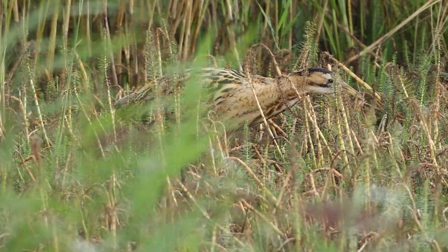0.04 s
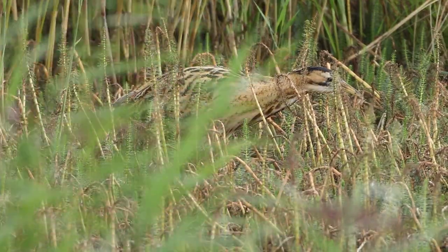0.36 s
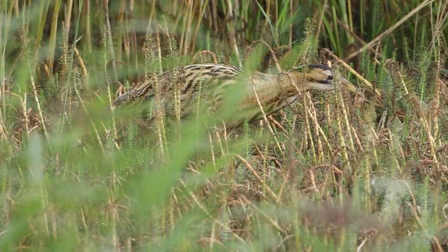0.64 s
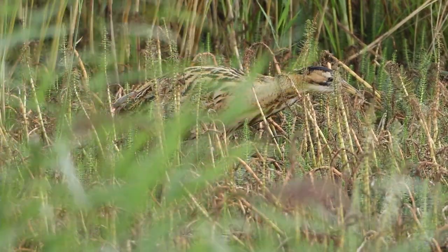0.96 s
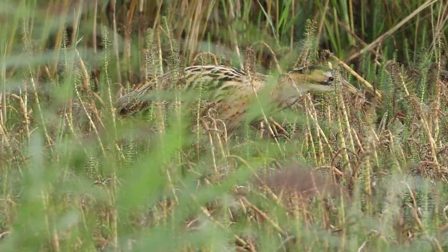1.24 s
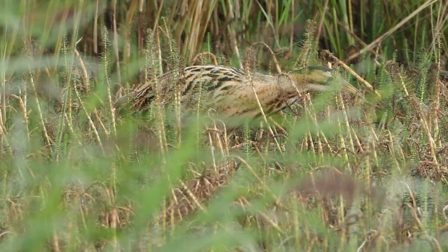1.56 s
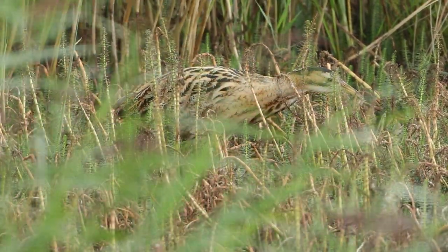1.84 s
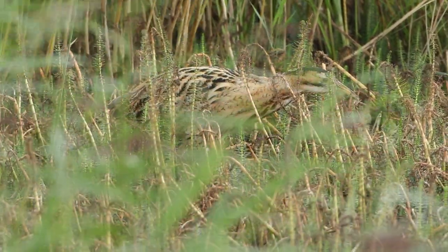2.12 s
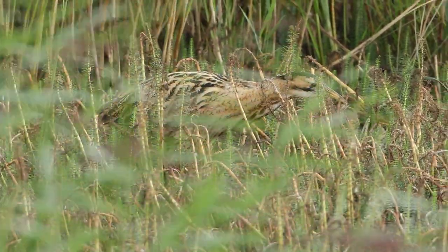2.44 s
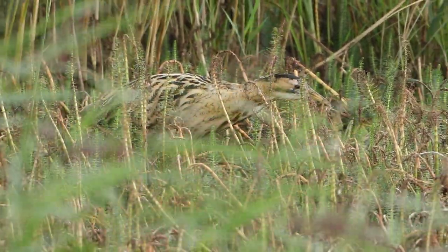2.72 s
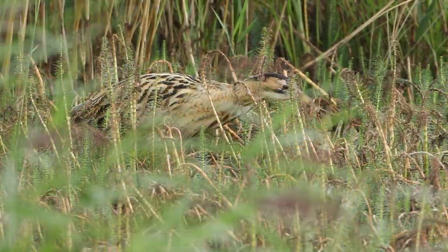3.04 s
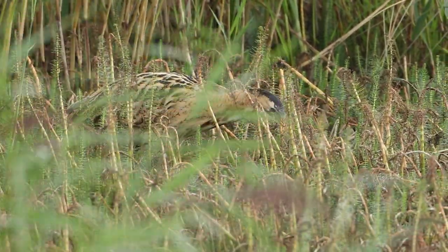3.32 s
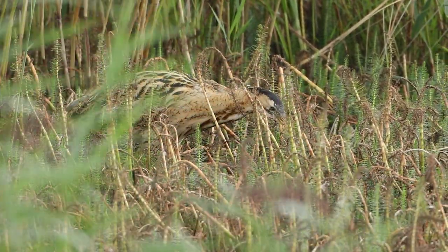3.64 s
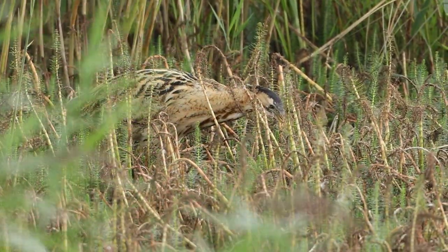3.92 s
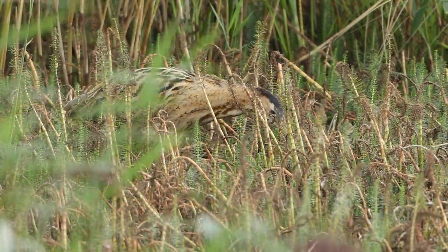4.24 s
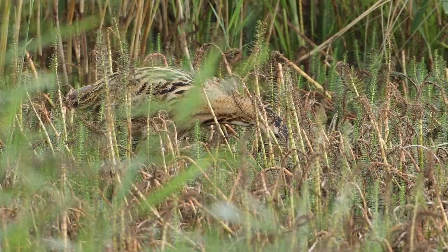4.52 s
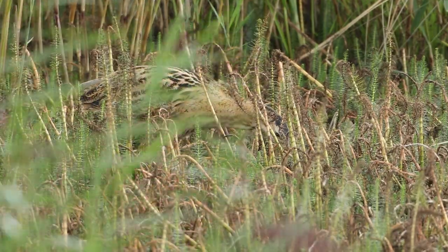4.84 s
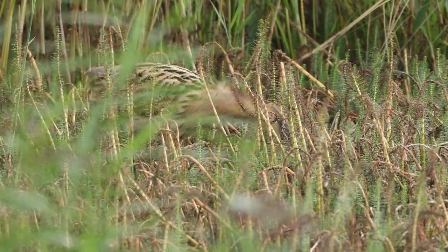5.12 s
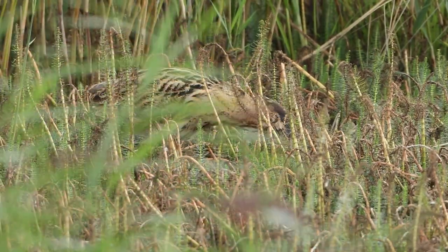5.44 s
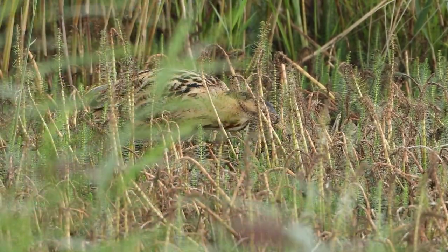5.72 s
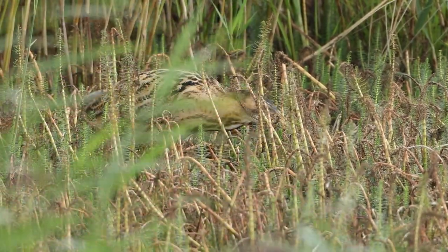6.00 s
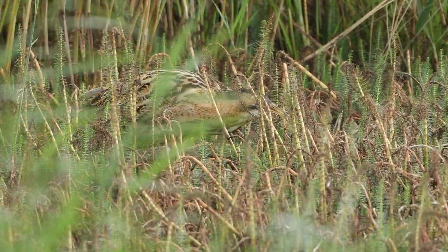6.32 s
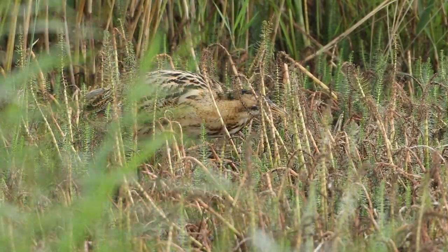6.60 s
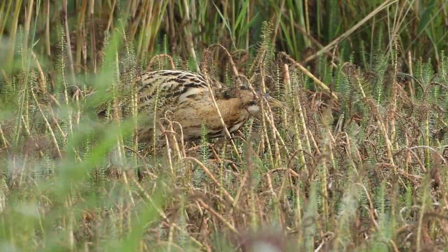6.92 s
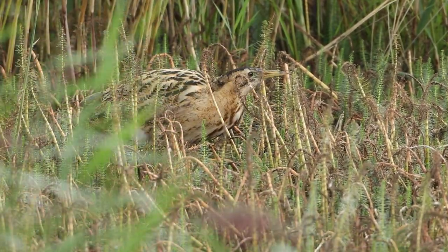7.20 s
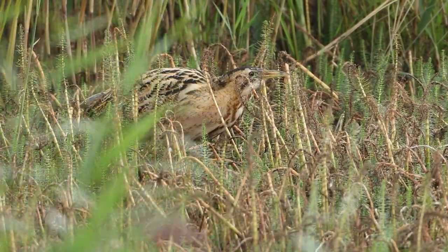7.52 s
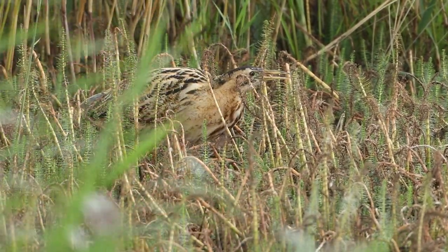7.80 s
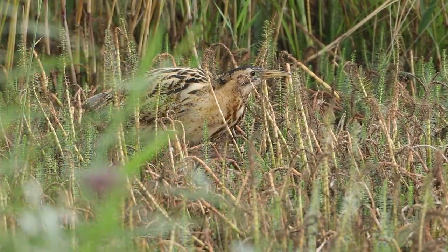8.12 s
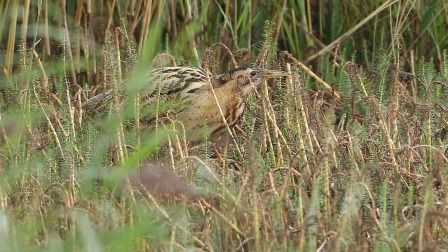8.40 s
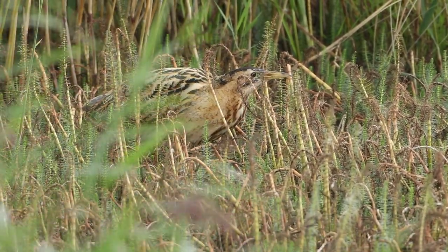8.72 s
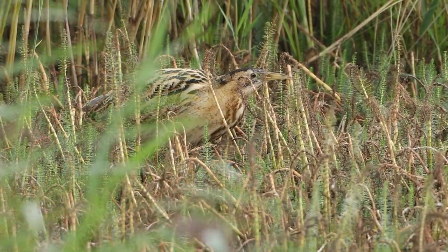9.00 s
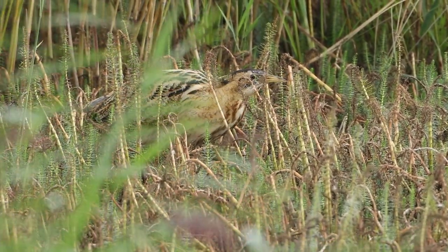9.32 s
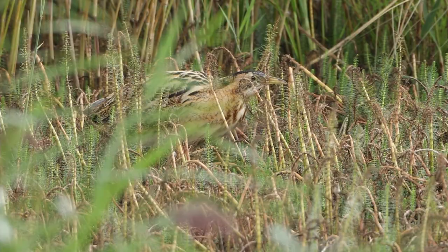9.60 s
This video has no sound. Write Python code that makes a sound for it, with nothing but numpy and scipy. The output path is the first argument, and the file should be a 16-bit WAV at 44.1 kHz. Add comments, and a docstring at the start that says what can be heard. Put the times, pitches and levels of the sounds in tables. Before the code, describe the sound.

Wind rumbles and thumps unevenly on the microphone in an open wetland, with a light hiss of leaves close by. A distant wood pigeon finishes a cooing phrase, then repeats it as a broad rush swells in the reeds. Later a small bird gives one faint, thin call. The gusts grow stronger, the hardest coming at the very end. Everything is heard on the left side only.

```python
"""Wind over a reed bed in an open wetland, picked up by one microphone on the left channel only.
From the start, turbulence buffets the microphone, smooth flow hums as it sheds vortices, close leaves
hiss and brush, and a far wood pigeon is partway through a phrase. From about 2 s it coos the phrase
again, while a broad rush swells in the far reeds and the stems sough. Near 7 s a small bird calls
faintly, once. The gusts then grow, and the hardest breaks into a roar at the very end."""
import sys
import numpy as np
from scipy import signal
from scipy.fft import rfft, irfft, next_fast_len
from scipy.io import wavfile
from scipy.ndimage import uniform_filter1d

SR = 44100
rng = np.random.default_rng(int(sys.argv[2]) if len(sys.argv) > 2 else 0)


def put_to_file(sound):
    """Save the sound as 16-bit audio at rate SR, in the file named by the first command-line argument."""
    columns = np.atleast_2d(sound).T  # one column per channel
    safe = np.clip(columns, -1, 1)
    whole_steps = np.round(safe * 32767)
    wavfile.write(sys.argv[1], SR, whole_steps.astype(np.int16))


N = 429975
TIME = np.arange(N) / SR

# spells of smooth flow: start_s, length_s, pitch_hz, level_db (all table levels are relative)
SMOOTH_SPELLS = [(0, .24, 49, -40.5), (.25, .53, 53.5, -38), (.95, .25, 55.6, -41), (1.88, .15, 45, -32.5),
                 (3.99, .11, 59, -35), (5.05, .34, 56, -35)]
CALM_EDGE_S = 0.057   # rise and fall time of smooth spells and lulls


def from_db(db):
    """Amplitude grows tenfold for every 20 decibels."""
    return 10 ** (np.asarray(db) / 20)


def rms_one(x):
    """Normalisation to unit mean power."""
    return x / np.sqrt(np.mean(x ** 2) + 1e-20)


def in_time(rows):
    """Linear interpolation of each column over the times in the first."""
    times, *columns = np.transpose(rows)
    return [np.interp(TIME, times, column) for column in columns]


def swell(start, length, edge_s):
    """An amplitude envelope that opens smoothly, holds and closes."""
    opening = np.clip(np.minimum(TIME - start, start + length - TIME) / edge_s + .5, 0, 1)
    return opening * opening * (3 - 2 * opening)


def drift(rate_hz):
    """Low-passed noise gives a slow random fluctuation; rms 1."""
    step, settle = 40, 2000
    pole = np.exp(-2 * np.pi * rate_hz * step / SR)
    noise = rng.standard_normal(N // step + settle + 2)
    slow = signal.lfilter([1], [1, -2 * pole, pole * pole], noise)[settle:]
    return np.interp(np.arange(N) / step, np.arange(len(slow)), rms_one(slow))


def coloured(x, spectrum):
    """Spectral shaping, with a fall of 24 dB an octave past the spectrum's ends; rms 1."""
    hz, db = np.transpose(spectrum)
    size = next_fast_len(N)
    octave, points = np.log2(np.fft.rfftfreq(size, 1 / SR) + 1), np.log2(hz)
    beyond = np.abs(octave - np.clip(octave, points[0], points[-1]))
    gain = from_db(np.interp(octave, points, db) - 24 * beyond)
    return rms_one(irfft(rfft(x, size) * gain, size)[:N])


def tone(hz):
    """A sine whose phase is the integral of its frequency; rms 1."""
    return np.sqrt(2) * np.sin(2 * np.pi * np.cumsum(hz) / SR)


def noise_band(centre_hz, width_hz):
    """Quadrature modulation carries low-passed noise to a moving centre frequency; rms 1."""
    narrow = signal.butter(2, width_hz / 2, fs=SR, output="sos")
    in_phase, quadrature = signal.sosfilt(narrow, rng.standard_normal((2, N)))
    phase = 2 * np.pi * np.cumsum(centre_hz) / SR
    return rms_one(in_phase * np.cos(phase) + quadrature * np.sin(phase))


def turbulence(spectrum, span_s):
    """Random pressure swings, divided by their smoothed envelope to hold their strength even."""
    swings = coloured(rng.standard_normal(N), spectrum)
    power = np.abs(signal.hilbert(swings, next_fast_len(N))[:N]) ** 2
    width = max(int(span_s * SR), 2)
    local_power = uniform_filter1d(uniform_filter1d(power, width), width)
    return rms_one(swings / np.sqrt(local_power + 1e-9))


def open_air(level_db=-57.5):
    """Stationary noise forms the dull background of the open land."""
    # ambient spectrum: frequency_hz, density_db
    spectrum = [(120, -17), (230, -0.5), (320, 3), (450, 4.5), (700, -5.5), (1200, -23), (2500, -12)]
    return from_db(level_db) * coloured(rng.standard_normal(N), spectrum)


def buffeting(roar_db=-40.0, roar_onset_db=-29, roar_growth=2.9, lump_rate_hz=14.5):
    """Turbulent pressure on the microphone: large eddies rumble, small ones flutter, hard gusts roar."""
    # the breeze between gusts: time_s, rumble_db, flutter_db
    breeze = [(0, -36.5, -54), (0.55, -44, -51.5), (0.83, -44, -52), (1.05, -28, -49), (1.3, -43, -58),
              (1.55, -37, -56), (1.9, -37, -47.5), (2.3, -43.5, -54), (2.7, -37, -51), (3.1, -36, -52),
              (3.6, -41, -49), (4.1, -41.5, -46.5), (4.85, -39.5, -47), (5.55, -37.5, -47.5),
              (6.35, -38.5, -42.5), (7.5, -37.5, -41), (8.2, -30, -45.5), (8.75, -36, -40),
              (9.05, -30, -39), (9.45, -34, -41), (9.6, -24.5, -32.5)]
    # lulls in the air at the microphone: start_s, length_s
    lulls = [(1.49, 0.13), (2.47, 0.36), (3.395, .05), (4.11, .09), (4.655, 0.27), (5.73, 0.043),
             (6.25, 0.28), (7.2, 0.083), (7.356, 0.18)]
    # gusts that thump the microphone: start_s, length_s, rumble_db, flutter_db
    gusts = [(0.58, 0.051, -28, -43), (0.913, 0.057, -29, -54), (1.318, 0.13, -35, -44),
             (1.65, 0.05, -45, -45), (1.705, 0.04, -34, -54), (1.848, 0.03, -36, -54),
             (2.065, 0.041, -38, -54), (2.259, 0.069, -31.5, -42.5), (2.375, 0.065, -41, -54),
             (2.895, 0.064, -37.5, -36.5), (3.047, 0.076, -34, -45.5), (3.14, 0.22, -40, -40),
             (3.54, 0.16, -39, -45.5), (3.828, 0.077, -32.5, -45), (4.218, 0.056, -34.5, -44),
             (4.48, 0.12, -36.5, -44), (5.689, 0.033, -27, -39), (5.808, 0.057, -33.5, -61),
             (6.012, 0.037, -30.5, -41), (6.122, 0.071, -32, -43), (6.543, 0.045, -31.5, -51),
             (6.91, 0.11, -42, -40), (7.022, 0.068, -35, -40), (7.303, 0.035, -36, -35),
             (7.631, 0.11, -31.5, -53), (7.844, 0.15, -30.5, -45.5), (8.07, 0.11, -31, -48),
             (8.282, 0.21, -19.5, -34), (8.835, 0.032, -23, -38), (8.907, 0.063, -35, -33),
             (9.184, 0.073, -34, -33.5), (9.29, 0.075, -28, -33), (9.62, 0.095, -33, -35),
             (9.714, 0.039, -17, -27.5)]
    # spectra of the large, small and finest eddies: frequency_hz, density_db
    rumble_spectrum = [(15, -18), (25, -7.5), (36, 2.5), (55, 4.5), (75, -1), (100, -13), (130, -28.5),
                       (200, -46)]
    flutter_spectrum = [(60, -6), (100, 7), (130, 0), (170, -5.5), (220, -14), (300, -28), (500, -55),
                        (1000, -59)]
    roar_spectrum = [(130, -11), (250, 9), (350, -3), (500, -19), (1000, -23), (2000, -46)]
    rumble_db, flutter_db = in_time(breeze)
    smooth_flow = sum(swell(start, length, CALM_EDGE_S) for start, length, _, _ in SMOOTH_SPELLS)
    lull = sum(swell(start, length, CALM_EDGE_S) for start, length in lulls)
    calm_db = -7 * smooth_flow - 5 * lull
    large_power = from_db(rumble_db + calm_db + 1.7 * drift(lump_rate_hz)) ** 2
    small_power = from_db(flutter_db + 2 * drift(lump_rate_hz)) ** 2
    for start, length, large_db, small_db in gusts:   # incoherent sources add in power
        gust = swell(start, length, edge_s=0.013)
        large_power += gust * from_db(large_db) ** 2
        small_power += gust * from_db(small_db) ** 2
    rumble = from_db(1.3) * np.sqrt(large_power) * turbulence(rumble_spectrum, span_s=0.047)
    flutter = from_db(1.04) * np.sqrt(small_power) * turbulence(flutter_spectrum, span_s=0.059)
    # the finest eddies grow faster than the gust itself
    strength = np.sqrt(small_power) / from_db(roar_onset_db)
    roar = from_db(roar_db) * strength ** roar_growth * turbulence(roar_spectrum, span_s=0.0097)
    return rumble + flutter + roar


def vortex_hum(flicker_db=2, waver=0.013):
    """Vortex shedding: smooth flow drops eddies at a nearly steady rate, heard as a low tone."""
    hz, = in_time([(start + length / 2, pitch) for start, length, pitch, _ in SMOOTH_SPELLS])
    level = sum(from_db(db) * swell(start, length, CALM_EDGE_S) for start, length, _, db in SMOOTH_SPELLS)
    return level * from_db(flicker_db * drift(4.0)) * tone(hz * (1 + waver * drift(6.4)))


def far_rush(rush_db, trim_db=1.55, patchy_db=-0.07):
    """Incoherent summation: countless far stems merge into a smooth rush."""
    # spectrum of the far reeds: frequency_hz, density_db
    spectrum = [(120, 0), (220, -3), (330, -5), (480, -3.5), (650, -3.5), (820, -3), (1050, -4),
                (1300, -6.5), (1600, -9), (2100, -18.5), (3000, -25), (4200, -33.5), (8000, -46)]
    level = from_db(rush_db + trim_db + patchy_db * drift(10.0))
    return level * coloured(rng.standard_normal(N), spectrum)


def leaf_hiss(hiss_db, trim_db=7.5, ticks_per_s=1100, grain_db=-6, size_spread_db=1.5, clump_db=1.5):
    """Shot noise: dry leaves tick more often as the wind rises, over a hiss of blended contacts."""
    # spectrum of the close leaves: frequency_hz, density_db
    spectrum = [(200, 3), (500, 15.5), (1200, 6.5), (2100, 3.5), (3050, 3.5), (3500, 1.5), (4100, 0),
                (4800, 0.54), (7500, -2.5), (10800, -7), (12300, -12), (13800, -20), (15500, -24)]
    tick_rate = ticks_per_s * from_db(hiss_db - hiss_db.max() + clump_db * drift(9))
    sizes = from_db(size_spread_db * np.minimum(rng.exponential(1, N), 4)) * rng.choice([-1, 1], N)
    ticks = rms_one(sizes * (rng.random(N) < tick_rate / SR))
    sway_db = .3 * drift(3)   # the hiss rises and falls as the stems sway
    contacts = rng.standard_normal(N) + from_db(grain_db) * ticks
    return from_db(hiss_db + trim_db + sway_db) * coloured(contacts, spectrum)


def pigeon(waver=0.0074, flicker_db=-1.0, slide_hz_per_s=600, echo_s=.16, echo_db=-20):
    """A coo is a tone plus narrow-band noise, hoarse where it slides or sinks; a faint echo follows."""
    # five notes of a wood pigeon's phrase, a curve each: time_in_phrase_s, pitch_hz, level_db
    notes = [
        [(.03, 418, -53), (.08, 442, -52), (.125, 512, -49), (.16, 486, -48.5), (.235, 478, -48),
         (.265, 492, -46.5)],
        [(.525, 488, -50.5), (.58, 493, -49.5), (.62, 488, -53), (.68, 490, -48), (.735, 495, -45.5),
         (.765, 510, -49.5), (.81, 494, -46.5), (.92, 500, -45), (.975, 492, -44.5), (1.0, 478, -47)],
        [(1.07, 250, -60), (1.14, 305, -59), (1.165, 420, -55), (1.18, 488, -46), (1.21, 525, -48),
         (1.235, 492, -44.5), (1.27, 476, -51), (1.31, 430, -55), (1.4, 398, -57), (1.53, 370, -60)],
        [(1.865, 450, -56), (1.895, 470, -51.5), (1.99, 425, -55)],
        [(2.17, 398, -61), (2.29, 420, -54), (2.37, 413, -58), (2.46, 410, -55), (2.62, 385, -59),
         (2.69, 330, -58)],
    ]
    # the two phrases: start_s, then gain_db for each of the five notes
    phrases = [(-.82, 0, -1.5, 1, -.5, .5), (2.22, 0, .5, -1, -1.5, -4)]
    clear_db, hoarse_db = -17, -4   # noise relative to the tone
    hoarse_hz, clear_hz = 400, 480
    voice = np.zeros(N)
    wobble = 1 + waver * drift(38.5)
    flicker = from_db(flicker_db * drift(30))
    for start, *gains_db in phrases:
        for note, gain_db in zip(notes, gains_db):
            curve = np.array(note) + [start, 0, gain_db]
            hz, db = in_time(curve)
            glide_hz_per_s = uniform_filter1d(np.abs(np.gradient(hz)) * SR, size=3000)
            sliding = np.clip(glide_hz_per_s / slide_hz_per_s, 0, 1)
            low = np.interp(hz, [hoarse_hz, clear_hz], [1, 0])
            hoarse = from_db(clear_db + np.maximum(sliding, low) * (hoarse_db - clear_db))
            level = from_db(db) * swell(curve[0, 0], curve[-1, 0] - curve[0, 0], edge_s=0.028)
            coo = tone(hz * wobble) + hoarse * noise_band(hz, width_hz=80)
            voice += level * coo / np.hypot(1, hoarse)
    voice *= flicker
    return voice + from_db(echo_db) * np.interp(TIME - echo_s, TIME, voice, left=0)


def leaf_brushes():
    """Sliding friction: one leaf passing over another gives a short swish of band-limited noise."""
    # contacts close by: time_s, level_db, half_length_s, band_hz
    contacts = [(.356, -63, .001, 8000), (.36, -73, .04, 9500), (2.083, -63, .001, 7000),
                (2.647, -60, .001, 7000), (3.773, -70, .02, 9500), (4.09, -68, .05, 6500),
                (4.547, -59, .001, 8000), (5.738, -59.5, .001, 8000), (8.129, -57, .001, 7000),
                (8.139, -68.5, 0.013, 9000), (8.143, -63, 0.01, 5480), (8.885, -62, 0.012, 3600)]
    out = np.zeros(N)
    for time_s, db, half_length, hz in contacts:
        band = signal.butter(2, [hz * 0.63, min(hz * 1.2, SR / 3)], "band", fs=SR, output="sos")
        envelope = np.exp(-((TIME - time_s) / half_length) ** 2 / 2)
        out += from_db(db) * envelope * rms_one(signal.sosfilt(band, rng.standard_normal(N)))
    return out


def eddy_hits():
    """A vortex has a low-pressure core, so it passes as a dip between two shallow rises."""
    # single eddies that hit the microphone: time_s, peak_db, half_width_s
    eddies = [(0.615, -21, 0.0038), (.82, -31.5, 0.0025), (1.049, -29, 0.0032), (1.173, -24, .0027),
              (1.268, -25, 0.0042), (1.386, -21.5, .003), (1.42, -23, 0.0023), (1.457, -26, 0.0034),
              (1.84, -31.5, .002), (2.003, -25.5, 0.0028), (2.152, -22, .004), (2.222, -22, 0.0045),
              (2.272, -27, 0.0046), (2.313, -32, 0.0033), (2.41, -28, 0.0029), (2.956, -16.5, 0.0023),
              (3.145, -22.5, 0.0026), (3.172, -24, 0.0029), (3.25, -24, 0.0026), (3.31, -24, 0.0027),
              (3.352, -23, 0.0044), (3.385, -27.5, 0.0026), (3.467, -23.5, 0.0028), (3.503, -25.5, .0023),
              (3.63, -31, .0023), (3.676, -23, 0.0028), (3.724, -27, 0.0031), (3.899, -18.5, 0.0035),
              (3.94, -27.5, 0.0024), (4.18, -30.5, 0.0033), (4.24, -26, 0.0031), (4.524, -27, 0.0022),
              (4.605, -27, 0.0046), (5.361, -27, .0038), (5.529, -24.5, .003), (5.612, -31.5, 0.0019),
              (5.707, -28, 0.0035), (6.017, -24, 0.0023), (6.464, -29, .0018), (6.542, -25, 0.0026),
              (6.69, -32.5, .002), (7.166, -22.5, .0035), (7.305, -21, 0.0054), (7.72, -26, .0021),
              (8.405, -18.5, 0.002), (8.841, -22, 0.0039), (8.929, -15, 0.0037), (8.96, -18, 0.003),
              (9.262, -19, 0.0019), (9.322, -12.5, 0.0028), (9.631, -18, 0.0016), (9.726, -8.5, 0.0026),
              (9.74, -9, 0.0017)]
    out = np.zeros(N)
    for time_s, db, half_width in eddies:
        offset = (TIME - time_s) / half_width
        out += from_db(db) * (offset ** 2 - 1) * np.exp(-offset ** 2 / 2)
    return out


def sough(width_hz=330, trim_db=-0.5):
    """Aeolian tones of many stems merge in a soft band that wanders between about 700 and 1070 Hz."""
    # wind singing round the stems: time_s, centre_hz, level_db
    band_curve = [(0, 700, -83), (2, 851, -63), (3.1, 1043, -61), (4, 894, -64), (5, 993, -66),
                  (5.7, 879, -55), (6.4, 999.4, -50), (7.3, 980, -52), (7.9, 792, -49.5), (8.5, 947, -65),
                  (9.1, 1068, -49.5), (9.75, 1038, -51.5)]
    hz, db = in_time(band_curve)
    return from_db(db + trim_db) * noise_band(hz, width_hz)


def small_bird(trim_db=7.0, flicker_db=2.5, waver=0.01494):
    """A thin, far whistle: a rising tone with random amplitude and frequency modulation."""
    # one call: time_s, pitch_hz, level_db
    call = [(6.765, 2950, -78), (6.78, 3050, -68), (6.815, 3300, -72), (6.842, 3750, -83),
            (6.866, 4150, -69), (6.878, 4200, -82)]
    hz, db = in_time(call)
    sounding = (TIME > call[0][0]) & (TIME < call[-1][0])
    level = sounding * from_db(db + trim_db + flicker_db * drift(50))
    return level * tone(hz * (1 + waver * drift(88)))


def scene():
    """Superposition: all pressures add at the one microphone; the right channel is silent."""
    # the wind in the reed bed: time_s, far_rush_db, leaf_hiss_db
    reed_wind = [(0, -58.5, -67.5), (0.7, -59.5, -66.5), (1.7, -55.5, -66), (2.4, -54, -64.5),
                 (3.1, -50.5, -63), (3.8, -50.5, -63), (4.1, -51, -63), (4.6, -49.5, -63),
                 (5.5, -47.5, -63), (6.4, -46.5, -63.5), (7.5, -46.8, -64), (8.5, -47, -64),
                 (9.1, -47.5, -64.5), (9.75, -48, -64.5)]
    rush_db, hiss_db = in_time(reed_wind)
    wind = buffeting() + vortex_hum() + eddy_hits()
    reeds = far_rush(rush_db) + leaf_hiss(hiss_db) + leaf_brushes() + sough()
    left = from_db(4.5) * (open_air() + wind + reeds + pigeon() + small_bird())
    return np.stack([left, np.zeros(N)])


def record(dry, cutoff_hz=15400):
    """Soft saturation rounds peaks near full scale; the ends fade briefly; a low-pass cuts the top."""
    rounded = dry / (1 + dry ** 8) ** (1 / 8)
    ends = swell(.002, TIME[-1] - .004, edge_s=.004)
    top_cut = signal.ellip(10, .1, 90, cutoff_hz, fs=SR, output="sos")
    return signal.sosfilt(top_cut, ends * rounded)


dry = scene()
out = record(dry)
put_to_file(out)
```